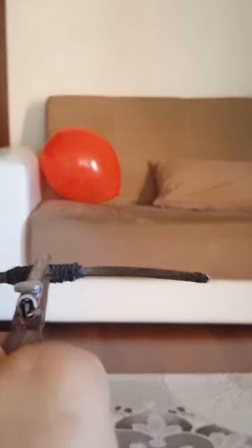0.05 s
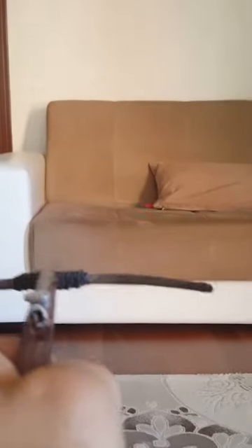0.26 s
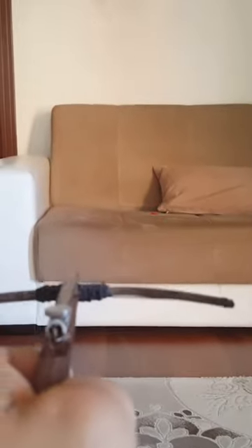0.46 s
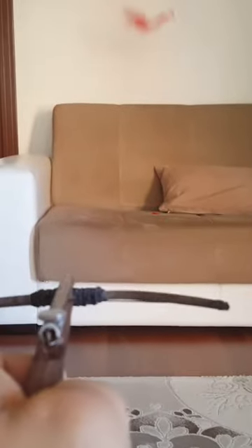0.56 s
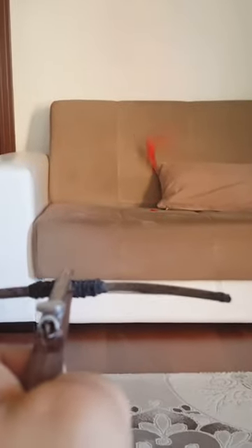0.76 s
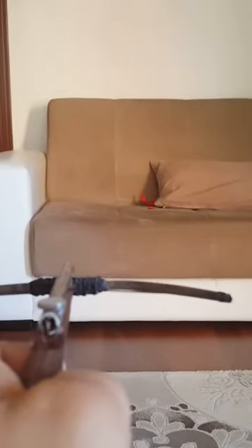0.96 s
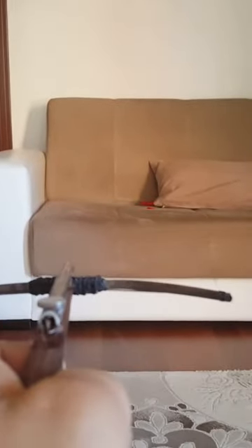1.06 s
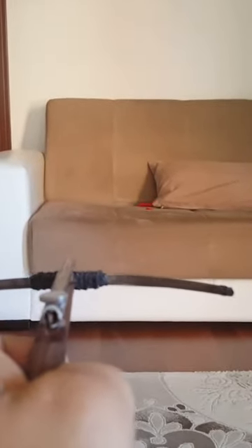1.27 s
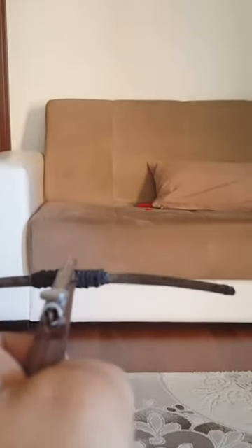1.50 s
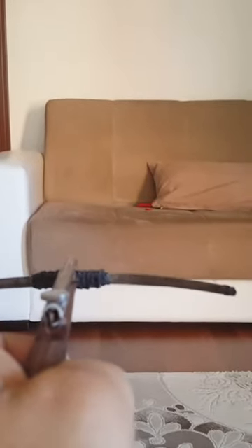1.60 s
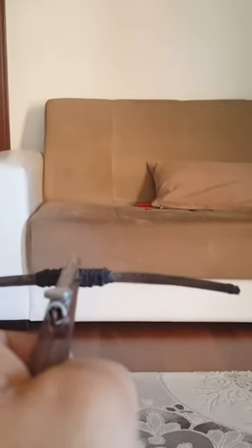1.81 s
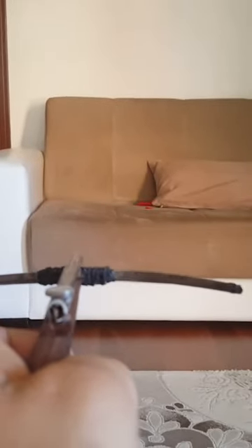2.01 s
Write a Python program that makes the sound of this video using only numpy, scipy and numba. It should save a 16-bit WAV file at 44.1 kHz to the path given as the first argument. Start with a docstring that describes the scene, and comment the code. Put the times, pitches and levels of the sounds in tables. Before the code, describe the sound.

A small click, then a very loud, sharp balloon pop ringing briefly round a room.

```python
"""Balloon shot in a living room

A trigger clicks close to the microphone, on the right. A fifth of a second later the shot bursts a balloon on a
sofa; the bang overloads the microphone and rings round the small room. The recorder's gain control ducks, and
quiet room tone, faint rustles, a thin squeak and a soft hum come up as it recovers."""
import sys
import numpy as np
from scipy import signal
from scipy.fft import rfft, irfft
from scipy.io import wavfile
from scipy.ndimage import uniform_filter1d
from numba import njit

SR = 44100
rng = np.random.default_rng(int(sys.argv[2]) if len(sys.argv) > 2 else 0)


def wrap_up_sound(samples):
    """Save the sound to the file named by the first command line argument, as 16-bit audio."""
    columns = np.atleast_2d(samples).T
    # keep every value between -1 and 1, then stretch to whole-number steps
    tamed = np.clip(columns, -1, 1)
    steps = np.round(tamed * 32767).astype(np.int16)
    wavfile.write(sys.argv[1], SR, steps)


N = 90404
BURST_S = .2252
BACKGROUND_PAN_DB = -2  # left minus right
BIN_HZ = np.arange(N // 2 + 1) * SR / N


def undb(db):
    """Decibels to gain."""
    return 10 ** (np.asarray(db) / 20)


def pan(left_minus_right_db):
    """Gains of the left and right channels."""
    return undb(np.array([[1], [-1]]) * left_minus_right_db / 2)


def curve(points):
    """Read (frequency, value) points at every spectrum bin, on a log-frequency axis."""
    hz, values = np.array(points, float).T
    return np.interp(np.log(np.maximum(BIN_HZ, 1)), np.log(hz), values)


def since(start_s):
    """Seconds since a moment, zero before it."""
    return np.maximum(np.arange(N) / SR - start_s, 0)


def low_cut(x, hz):
    """A gentle high-pass."""
    return signal.sosfilt(signal.butter(2, hz, "high", fs=SR, output="sos"), x)


def noise(bin_gain):
    """Diffuse stereo noise of unit level with the given spectrum; the channels are alike in the bass."""
    # likeness of the two channels: frequency_hz, correlation
    likeness = [(60, 0.84), (200, 1), (380, .85), (700, 0.35), (1280, -0.24), (2400, 0.15), (4400, -0.04),
                (8000, 0)]
    # channel balance: frequency_hz, left_minus_right_db
    balance = [(100, -0.5), (380, -0.54), (700, -0.9), (1300, 0.67), (2400, -0.4), (4400, -6.5), (8000, -3),
               (14000, -1.5)]
    mid, side = rfft(rng.standard_normal((2, N)))
    correlation = np.clip(curve(likeness), -.99, .99)
    stereo = mid * np.sqrt(1 + correlation) + np.array([side, -side]) * np.sqrt(1 - correlation)
    x = irfft(stereo * pan(curve(balance)) * bin_gain, N)
    return x / x.std()


def band(hz, width_hz):
    """Noise in one smooth band."""
    return noise(np.exp(-2 * ((BIN_HZ - hz) / width_hz) ** 2))


def ring(modes, start_s):
    """Damped modes struck at one moment."""
    t = since(start_s)
    return sum(undb(db) * np.sin(2 * np.pi * hz * t) * undb(-60 * t / t60_s) for hz, db, t60_s in modes)


def swell(start_s, rise_s, t60_s):
    """An envelope that builds up and dies away."""
    t = since(start_s)
    return (1 - np.exp(-t / rise_s)) * undb(-60 * t / t60_s)


def room_tone():
    """The quiet room: slightly wavering noise and a low hum."""
    # spectrum of the room noise: frequency_hz, relative_db
    air_spectrum = [(25, -10.5), (90, -2), (140, -7), (260, -6.5), (430, -7.5), (650, -12), (1300, -12),
                    (3200, -18.5), (4700, -26.5), (8000, -30), (9500, -38.5), (15000, -38)]
    waver_db = .68 * band(0, width_hz=10)[0]
    air = undb(-50 + waver_db) * noise(undb(curve(air_spectrum)))
    hum = undb(-59) * band(97, width_hz=14)
    return (air + hum) * pan(BACKGROUND_PAN_DB)


def trigger():
    """Close on the right, a quick run of contacts rings the trigger with a dry snap; the room answers."""
    # contacts in the trigger: start_s, relative_db
    contacts = [(.0300, -10.5), (.0310, -0.5), (0.0336, -6.5), (0.0355, -8), (0.0376, -7.5)]
    # modes of the trigger: pitch_hz, relative_db, t60_s
    modes = [(1100, -33, 0.017), (1160, -16, 0.03), (1405, -42, .22), (2075, -37, 0.21), (3150, -38, .05),
             (4540, -5.5, 0.018), (5100, -7, 0.013), (5740, -4.5, 0.02), (8060, -14, 0.0094),
             (12900, -28, .007)]
    # spectrum of the snap and the room's answer: frequency_hz, relative_db
    wash_spectrum = [(400, -24.5), (1100, -7.5), (3000, -10), (4500, -3), (5600, 4), (6400, -7),
                     (8300, -3.5), (10000, -13), (15000, -14)]
    click = low_cut(sum(undb(db) * ring(modes, start_s) for start_s, db in contacts), hz=910)
    first_s = contacts[0][0]
    snap = undb(-26.5) * swell(first_s, rise_s=.00038, t60_s=.04)
    answer = undb(-36.5) * swell(first_s, rise_s=.0015, t60_s=.36)
    wash = (snap + answer) * noise(undb(curve(wash_spectrum)))
    return undb(-18) * click * pan(-9.5) + wash


def balloon():
    """The balloon bursts: the blast reaches the microphone first, then dense clusters of reflections."""
    # swings of the freed air and the tearing rubber: pitch_hz, relative_db, t60_s
    burst_modes = [(185, -0.5, .06), (240, -0.5, .04), (1748, 8, .018), (2347, 8, .016), (4000, 3, .012)]
    # reflections off near surfaces, side walls and far wall: start_s, level_db, rise_s, t60_s
    clusters = [(.2252, 9, 0.0016, 0.11), (0.2327, 10.5, 0.0016, 0.2), (.285, 7, 0.02, .19)]
    # spectrum of the first reflections from sofa, floor and walls: frequency_hz, relative_db
    early_spectrum = [(30, -13.5), (90, -14.5), (160, 2), (250, 3.5), (420, 1), (700, -5), (1300, -5.5),
                      (2100, 1), (3200, -8.5), (5000, -6.5), (9000, -19.5), (15000, -23)]
    blast = undb(3) * ring(burst_modes, BURST_S)
    arrivals = sum(undb(db) * swell(start_s, rise_s, t60_s) for start_s, db, rise_s, t60_s in clusters)
    reflections = arrivals * noise(undb(curve(early_spectrum)))
    return low_cut(blast + reflections, hz=130)  # the microphone's bass roll-off


def reverberation():
    """The bang fills the room: each band dies at its own rate, and standing waves ring on."""
    # spectrum of the reverberation: frequency_hz, relative_db
    tail_spectrum = [(30, -22), (100, -14), (170, -5), (250, 3.5), (420, -0.5), (650, -6.5), (1200, -4.5),
                     (1750, -1.5), (2450, -2.5), (3000, -9.5), (5200, -9.5), (8000, -13), (9500, -23),
                     (15000, -24.5)]
    # decay of the room by band: centre_hz, t60_s
    decays = [(100, .6), (250, .48), (700, .44), (1300, .42), (2100, 0.51), (3200, .42), (4800, .42),
              (8000, .38), (13000, 0.24)]
    # standing waves of the room: pitch_hz, relative_db, t60_s
    standing_waves = [(216.4, -1, .58), (253.7, 4, .35), (320.7, -5, .46), (404, 5.5, 0.4),
                      (497, -1.5, 0.32), (638, -4, 0.27), (929, -6, 0.39), (1097, -5, 0.32),
                      (1713, -3, 0.29), (2082, -4, 0.55), (2197, -3.5, 0.57), (2238, -4.5, .45),
                      (2442, -4.5, .45)]
    spectrum = rfft(noise(undb(curve(tail_spectrum))))
    tail = 0
    for centre_hz, t60_s in decays:
        band_gain = curve([(hz, hz == centre_hz) for hz, _ in decays])  # fades to 0 at its neighbours
        tail += irfft(spectrum * band_gain, N) * swell(BURST_S, rise_s=.04, t60_s=t60_s)
    return undb(8) * tail + undb(-7) * ring(standing_waves, BURST_S)


def faint_swells():
    """Faint rustles, a thin squeak and a soft hum after the bang: bands of noise that rise quickly and fade
    more slowly."""
    # swells of noise: start_s, length_s, centre_hz, width_hz, level_db
    swells = [(0.962, .1, 694, 700, -51), (1.043, .14, 261, 79.83, -51.5), (1.224, .13, 1090, 200, -60),
              (1.346, 0.093, 3560, 1391, -52), (1.383, .15, 1250, 260, -52.5),
              (1.52, 0.71, 6400, 7950, -65), (1.62, .2, 442, 44.5, -57.5), (1.721, 0.064, 3200, 1010, -52),
              (1.869, 0.12, 2600, 2420, -50), (1.929, 0.13, 440, 110, -52)]
    out = 0
    for start_s, length_s, centre_hz, width_hz, db in swells:
        progress = np.minimum(since(start_s) / length_s, 1)
        out += undb(db) * np.sin(np.pi * progress ** .52) * band(centre_hz, width_hz)
    return out * pan(BACKGROUND_PAN_DB)


def scene():
    """Click, bang and reverberation over the quiet of the room."""
    return trigger() + balloon() + reverberation() + room_tone() + faint_swells()


@njit
def duck(wanted_db, attack_s, hold_s, release_s):
    """The gain control's cut in dB: it rises fast, holds, then lets go."""
    out = np.empty(len(wanted_db))
    cut_db, hold_samples = 0., 0.
    for i in range(len(wanted_db)):
        if wanted_db[i] > cut_db:
            cut_db += (wanted_db[i] - cut_db) / (attack_s * SR)
            hold_samples = hold_s * SR
        elif hold_samples > 0:
            hold_samples -= 1
        else:
            cut_db -= cut_db / (release_s * SR)
        out[i] = cut_db
    return out


def record(dry):
    """The recorder ducks under the bang, rounds off the overload and cuts the top treble."""
    threshold_db, max_cut_db, top_hz = -14, 17.5, 15600
    power = uniform_filter1d(np.mean(dry ** 2, axis=0), size=256)
    level_db = 10 * np.log10(np.maximum(power, 1e-12))
    wanted_db = np.clip(2 * (level_db - threshold_db), 0, max_cut_db)
    ducked = dry * undb(-duck(wanted_db, attack_s=.011, hold_s=.54, release_s=.34))
    saturated = .99 * ducked / (1 + ducked ** 4) ** .25
    top_cut = signal.ellip(8, .2, 55, top_hz, fs=SR, output="sos")
    return np.clip(signal.sosfilt(top_cut, saturated), -1, 1)


dry = scene()
out = record(dry)
wrap_up_sound(out)
```